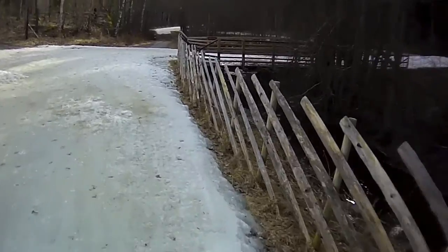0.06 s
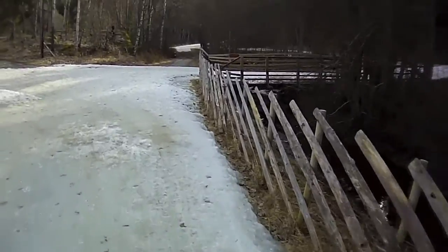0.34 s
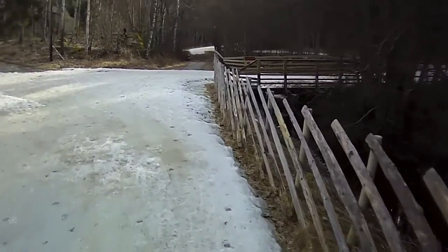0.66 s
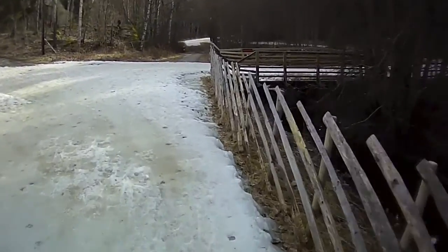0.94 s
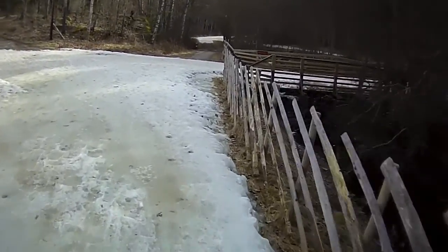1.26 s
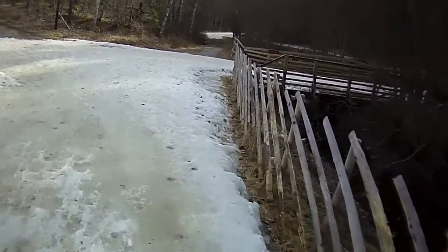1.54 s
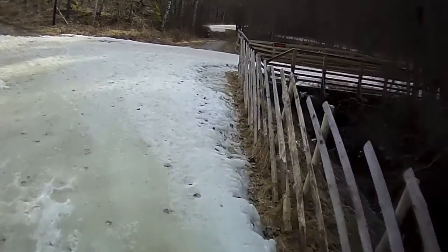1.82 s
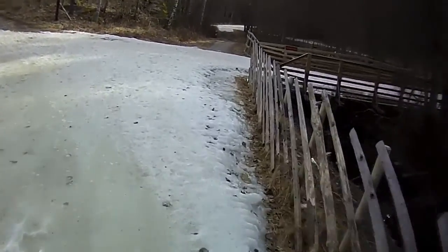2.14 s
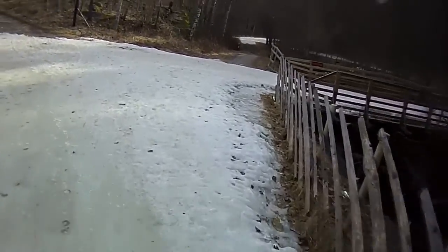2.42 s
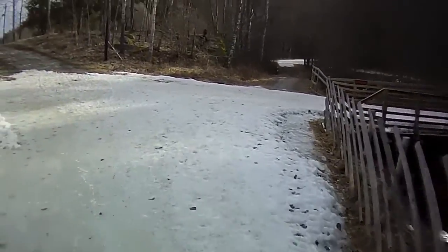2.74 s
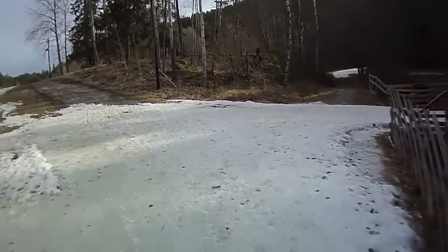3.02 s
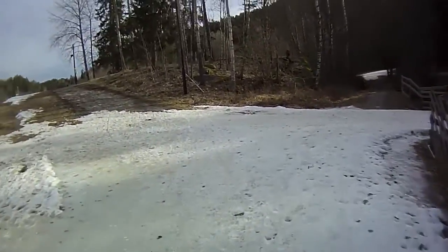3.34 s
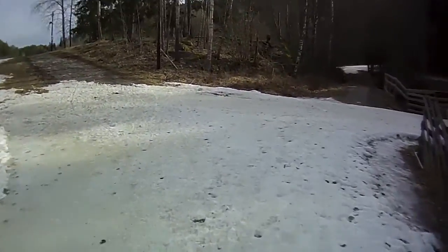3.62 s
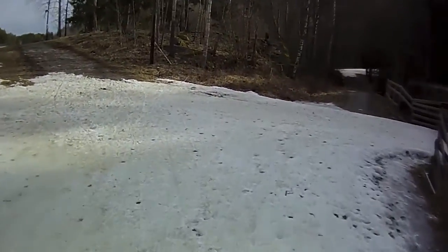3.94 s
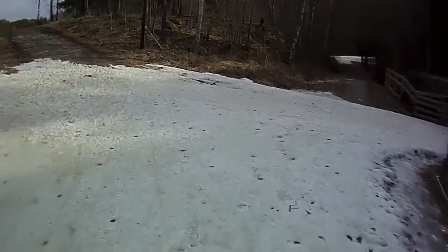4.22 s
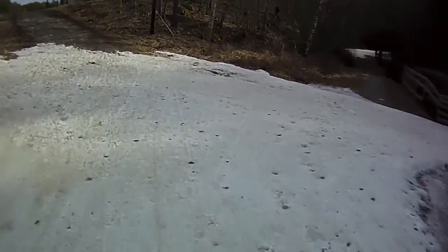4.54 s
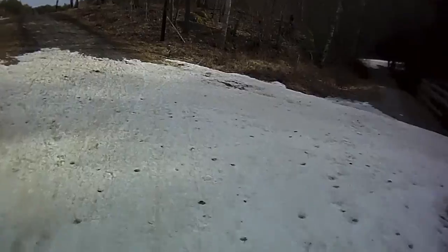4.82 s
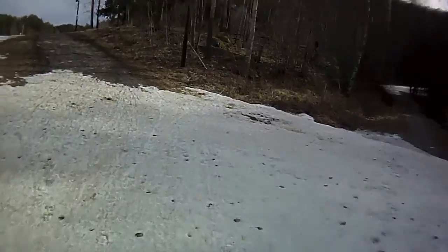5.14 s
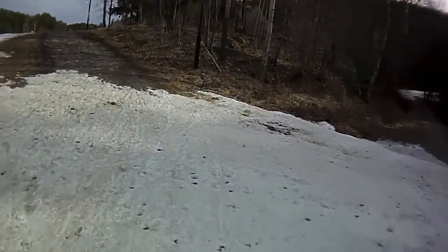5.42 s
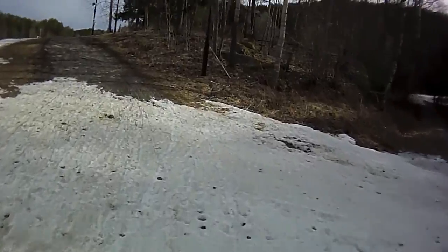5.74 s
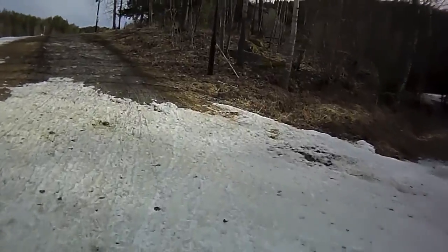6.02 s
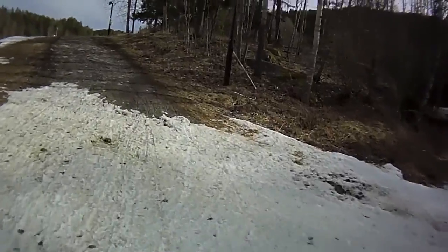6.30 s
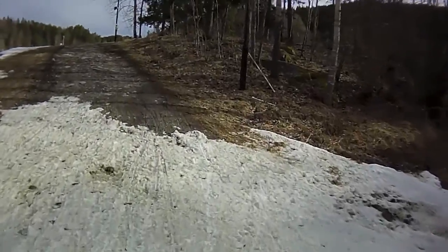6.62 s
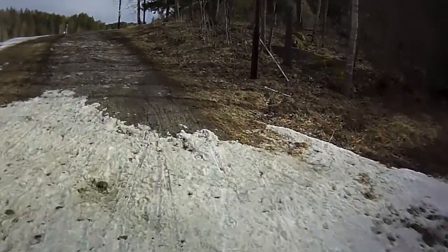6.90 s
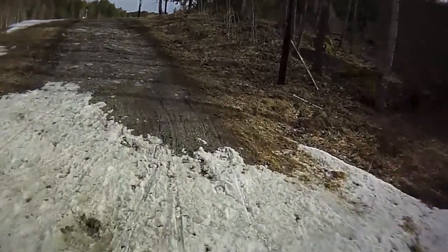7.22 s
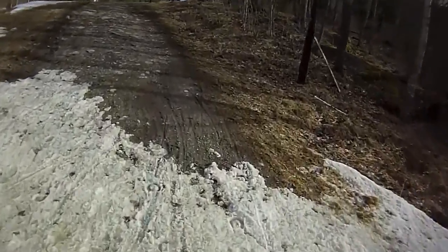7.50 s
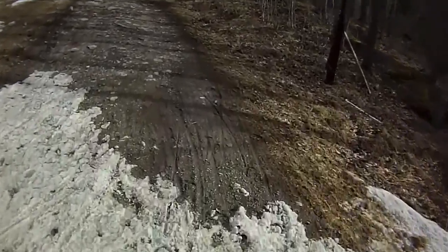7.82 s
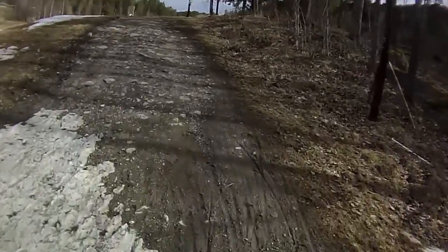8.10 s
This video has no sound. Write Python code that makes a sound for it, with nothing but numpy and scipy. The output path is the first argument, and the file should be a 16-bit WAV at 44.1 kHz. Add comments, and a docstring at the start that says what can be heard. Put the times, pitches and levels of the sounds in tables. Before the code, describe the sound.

Bicycle tyres crunch over gritty ice and crusted snow, with popping stones and knocks, as wind rumble grows into hard buffeting.

```python
"""A bicycle rolls towards a gravel track, heard from a camera on the rider. First gritty ice: grains crack
under the tyres in clusters, stones pop, the tread drums, bumps ring the hollow body. After 2 s smooth
ice quiets the crunch and a far bird whistles four notes. From 3 s the crunch returns, coarser; a low
gust passes at 4.5 s as grit gives way to crusted snow. From 6 s wind buffets the microphone hard."""
import sys
import numpy as np
from scipy import signal
from scipy.fft import rfft, irfft
from scipy.io import wavfile
from scipy.ndimage import uniform_filter1d

SR = 44100
rng = np.random.default_rng(int(sys.argv[2]) if len(sys.argv) > 2 else 0)


def wav_out(sig):
    """Save sig, one row per channel (or a flat mono array), as 16-bit PCM at SR to the path in sys.argv[1]."""
    wavfile.write(sys.argv[1], SR, np.round(np.clip(np.atleast_2d(sig).T, -1, 1) * 32767).astype(np.int16))


N = 368674
T = np.arange(N) / SR

# Far bird's notes. Each row: start in seconds, peak in dB.
BIRD_NOTES = [(2.175, -61), (2.395, -65), (2.61, -65), (2.82, -64)]
# Wind on the microphone. Each row: time in seconds, relative level in dB.
WIND_DB = [(0, -55), (.15, -46.5), (.4, -52.5), (.75, -44), (1.5, -44), (2.5, -46), (3.2, -50.5),
           (3.8, -43.5), (4.35, -43), (4.8, -45.5), (5.0, -41.5), (5.45, -40), (6.0, -31.5), (6.5, -32),
           (7.4, -28.5), (7.85, -32), (8.36, -31)]
# Eddies on top of the wind. Each row: middle in seconds, length in seconds, rise in dB.
EDDIES = [(2.12, 0.063, 2.5), (2.51, 0.079, 3.5), (2.88, .07, 5), (4.01, .06, 5), (4.21, 0.098, 3.5),
          (5.11, .05, 3.5), (6.09, 0.085, 4), (6.4, 0.045, 6.5), (7.02, 0.038, 1), (7.45, 0.051, 0.5),
          (8.0, .12, 2.5)]
# Light wind spectrum. Each row: frequency in Hz, gain in dB.
BREEZE_EQ = [(8, -30.5), (22, 4), (45, 1), (80, -3), (120, -9), (200, -18.5), (400, -21.5), (1500, -75)]
# Strong wind spectrum. Each row: frequency in Hz, gain in dB.
BUFFET_EQ = [(8, -17), (25, -4), (48, -2), (72, 3.5), (105, -4.5), (160, -8.5), (260, -17), (450, -23.5),
             (800, -38.5), (3000, -97)]
# Knocks on the bike. Each row: start in seconds, thud peak in dB.
BUMPS = [(0.195, -32.5), (0.966, -45), (2.201, -36.5), (3.618, -47), (3.974, -31), (4.289, -35),
         (5.022, -41), (5.134, -42), (5.336, -39), (5.807, -34), (6.294, -31), (7.014, -31), (7.102, -28.5),
         (7.135, -34), (8.234, -30.5)]
# Modes of the bike's body. Each row: frequency in Hz, gain in dB, T60 in seconds.
BODY_MODES = [(285.6, 5.5, .11), (299.7, 6.5, 0.21), (430, -18, 0.07), (476, -21, .07), (552, -6.5, 0.065),
              (614.5, -5, 0.23), (748, -5.5, 0.11), (896, -9, 0.11)]
# Tyre drumming spectrum. Each row: frequency in Hz, gain in dB.
TYRE_EQ = [(120, -26), (230, -6.5), (290, 5), (350, 4), (450, 3.5), (600, -2.5), (820, -13), (1200, -4.5),
           (2500, -45.5), (7000, -58)]
# Rolling noise. Each row: time in seconds, relative level in dB.
ROLL_DB = [(0, -59.5), (.25, -54), (1.4, -58), (2.1, -54), (2.65, -61.5), (3.7, -49), (4.4, -52),
           (5.0, -48.5), (5.9, -51.5), (6.2, -47), (6.95, -43), (7.75, -51), (8.3, -42.5)]
# Crunch of grit, smooth ice, then crusted snow. Each row: time in seconds, level in dB.
GROUND_DB = [(0, -46), (1.2, -50), (1.75, -46.5), (2.1, -47.5), (2.3, -58), (2.65, -61.5), (3.0, -53.5),
             (3.2, -47.5), (3.55, -53.5), (3.8, -47), (4.15, -47.5), (4.4, -45.5), (5.3, -46), (6.2, -45.5),
             (6.7, -46), (7.3, -47), (7.85, -48.5), (8.36, -42.5)]
# Crust caving in. Each row: middle in seconds, length in seconds, rise in dB.
CRUSHES = [(.15, .1, 2), (.43, 0.024, 2), (1.097, 0.11, 5), (1.65, 0.09, 0.5), (1.93, .025, 6),
           (2.03, 0.021, 6), (2.093, 0.031, 7), (2.205, 0.018, 5), (2.5, .06, 10.5), (2.9, 0.042, 9.5),
           (3.19, 0.047, 1.5), (3.495, .04, 9), (3.625, .025, 8), (3.89, 0.029, 7), (4.286, 0.079, 4.5),
           (4.758, 0.068, 8), (4.98, 0.048, 7), (5.03, .04, 6.5), (5.26, 0.027, 6.5), (6.04, 0.02, 5.5),
           (6.684, .13, 6), (6.96, 0.027, 10.5), (7.61, 0.092, 6.5)]
# Slick spots. Each row: middle in seconds, length in seconds, drop in dB.
SLICKS = [(0.079, 0.024, 10), (0.317, 0.042, 8.5), (1.185, .03, 5), (1.358, 0.033, 8), (1.758, 0.041, 11),
          (2.83, 0.024, 3), (3.0, .06, 5), (3.386, 0.028, 10), (3.924, 0.047, 8), (4.01, 0.033, 6),
          (4.242, 0.024, 18), (4.648, 0.038, 8), (4.914, 0.041, 12.5), (5.108, .03, 7), (5.315, 0.02, 2),
          (5.55, 0.021, 7.5), (7.2, 0.023, 6), (7.96, 0.017, 15)]
# Share of coarse crust and gravel. Each row: time in seconds, relative weight in dB.
COARSE_DB = [(0, -3.5), (.8, -5), (1.6, -4.5), (2.3, -5), (2.9, -6), (3.25, 0), (3.9, 1.5), (4.4, -3),
             (5.05, 0), (6.3, -0.5), (7.7, -1), (8.3, 3)]
# Larger stones and ice chips. Each row: time in seconds, relative peak in dB, pitch in Hz.
STONES = [(0.1187, -22, 2980), (0.4163, -24, 2950), (0.8829, -27, 2880), (1.0614, -25, 2910),
          (1.2064, -26, 3140), (1.2732, -26, 2160), (1.588, -27, 3040), (1.6235, -22, 2910),
          (1.861, -16, 2320), (1.9231, -17, 3900), (2.0287, -19, 2910), (2.0433, -26, 1860),
          (2.0892, -25, 3080), (2.1469, -27, 3020), (2.439, -35, 3500), (2.7791, -35, 3500),
          (2.883, -28, 3130), (2.905, -26, 3170), (3.1105, -26, 2210), (3.1395, -27, 2390),
          (3.1713, -26, 2270), (3.186, -20, 2090), (3.2365, -20, 2390), (3.274, -22, 1860),
          (3.3114, -21, 2230), (3.5343, -26, 2150), (3.6667, -25, 2420), (3.7995, -23, 2720),
          (3.8858, -23, 2830), (3.9779, -26, 1880), (4.2881, -22, 3020), (4.5183, -23, 2800),
          (4.9657, -27, 3410), (5.0318, -19, 2050), (5.3387, -24, 3250), (5.3831, -22, 2870),
          (5.5661, -28, 2240), (5.8106, -24, 1980), (5.8595, -26, 3260), (6.4668, -24, 2850),
          (6.9598, -24, 2770), (7.0351, -25, 2360), (7.3253, -23, 2400), (7.8402, -22, 2580),
          (8.0025, -24, 1400), (8.1749, -20.5, 2840), (8.218, -25, 1300), (8.2699, -22, 2920)]
# Response of the camera's case. Each row: frequency in Hz, gain in dB.
CASE_EQ = [(300, -10.5), (850, -9), (1150, -3.5), (2000, 3), (2700, 3.5), (3350, 7), (3650, -0.5),
           (4050, 0.5), (4700, -4.5), (5650, -16), (6300, -15), (7200, -21.5), (8000, -25), (15000, -50)]
# Camera hiss spectrum. Each row: frequency in Hz, gain in dB.
HISS_EQ = [(100, 6.5), (7500, -2.5), (8350, -4.5), (8600, 3.5), (8850, -2.5), (15000, -4)]


def undb(db):
    """Decibels to gain."""
    return 10 ** (np.asarray(db) / 20)


def unit(x):
    """Scale to rms 1."""
    return x / np.sqrt(np.mean(x ** 2))


def curve(table):
    """Rows of time and value, joined linearly."""
    return np.interp(T, *np.transpose(table))


def hump(middle_s, length_s):
    """Bell curve; length_s is the width at half height."""
    return np.exp2(-(2 * (T - middle_s) / length_s) ** 2)


def swells(table):
    """Sum of humps in dB."""
    return sum(db * hump(middle_s, length_s) for middle_s, length_s, db in table)


def walk(knots_per_s):
    """Random wander, rms 1."""
    knots = rng.standard_normal(6000)
    return unit(np.interp(T * knots_per_s, np.arange(len(knots)), knots))


def colour(x, eq, size=4096):
    """Minimum-phase filter with response eq."""
    hz, db = np.transpose(eq)
    bins_hz = np.maximum(np.arange(size // 2 + 1) * SR / size, 1)
    gain = undb(np.interp(np.log(bins_hz), np.log(hz), db))
    cepstrum = irfft(np.log(gain))
    cepstrum[1:size // 2] *= 2
    cepstrum[size // 2 + 1:] = 0
    return signal.fftconvolve(x, irfft(np.exp(rfft(cepstrum))))[:len(x)]


def ring(x, hz, t60_s):
    """One damped mode; a unit click rings with amplitude 1."""
    r, w = np.exp(-np.log(1000) / (t60_s * SR)), 2 * np.pi * hz / SR
    return signal.lfilter([0, r * np.sin(w)], [1, -2 * r * np.cos(w), r * r], x + 1e-18)


def add(out, start_s, x):
    """Mix x into out."""
    i = max(int(start_s * SR), 0)
    out[i:i + len(x)] += x[:len(out) - i]


def clicks(per_s, spread_db, limit):
    """Random clicks of either sign; level is spread_db times an exponential draw capped at limit."""
    chance = rng.random(N) * SR / per_s
    at = np.flatnonzero(chance < 1)
    out = np.zeros(N)
    out[at] = undb(spread_db * np.minimum(-np.log(chance[at]), limit)) * (-1.) ** at
    return out


def bird(size=3000):
    """Short whistles slide down and level off; pitch jitter stands for blurring by trees."""
    out, progress = np.zeros(N), np.arange(size) / size
    for start_s, db in BIRD_NOTES:
        hz = 4500 + 650 * np.exp(-progress / .33) + 120 * walk(600)[:size]
        whistle = np.sin(2 * np.pi * np.cumsum(hz) / SR)
        add(out, start_s, undb(db) * np.sin(np.pi * progress) * whistle)
    return out


def gust():
    """One slow, low eddy flaps past the microphone."""
    flap = unit(ring(rng.standard_normal(N), hz=39.3, t60_s=0.14))
    return flap * undb(-36) * hump(middle_s=4.54, length_s=0.19)


def wind():
    """Soft rumble turns to brighter, choppy buffeting as the air speeds up."""
    db = curve(WIND_DB) + swells(EDDIES)
    rough = np.clip((db + 45) / 9, .02, 1)
    breeze = unit(colour(rng.standard_normal(N), BREEZE_EQ))
    buffet = unit(colour(rng.standard_normal(N) * undb(1.46 * walk(28)), BUFFET_EQ))
    return undb(db - 2) * (np.sqrt(1 - rough) * breeze + np.sqrt(rough) * buffet)


def body(force):
    """The bike's hollow ring."""
    return sum(undb(db) * ring(force, hz, t60_s) for hz, db, t60_s in BODY_MODES)


def bumps(size=12000, decay_s=0.0079):
    """Short rattling blows thud and ring the body."""
    out, t = np.zeros(N), np.arange(size) / SR
    for start_s, db in BUMPS:
        force = 0.68 * rng.standard_normal(size) * np.exp(-t / decay_s)
        force[0] = 1
        thud, tone = colour(force, TYRE_EQ), body(force)
        knock = thud / np.abs(thud).max() + 0.53 * tone / np.abs(tone).max()
        add(out, start_s + 0.001915, undb(db) * knock)
    return out


def tread_load_db():
    """Crunch level: uneven ground sets it, caving crust lifts it, slick spots drop it."""
    return curve(GROUND_DB) + swells(CRUSHES) - swells(SLICKS) + 1.72 * walk(45)


def rolling(load_db):
    """The tread drums on rough crust and rings the body, harder where the crust gives way."""
    jolt_db = 0.51 * (load_db - uniform_filter1d(load_db, size=16000))
    road = clicks(per_s=1800, spread_db=5.5, limit=4.37) * undb(2.04 * walk(22) + jolt_db)
    drum = unit(colour(road, TYRE_EQ)) + undb(-0.5) * unit(body(road))
    return drum * undb(curve(ROLL_DB) - 2)


def swish(load_db, usual_db=-47.5):
    """Wet crystals fizz under the tread, steadier than the crunch."""
    fizz = colour(rng.standard_normal(N), [(800, 6), (2500, -3), (4400, 1.5), (7000, -4), (15000, -5)])
    return unit(colour(fizz, CASE_EQ)) * undb(.5 * (load_db - usual_db) - 58)


def chip(force, hz, cycles, crack):
    """A chip of ice or grit swells within a cycle and fades; its broad crack rides on top."""
    tone = ring(force, hz, cycles / hz)
    return ring(tone, hz, cycles / hz) * hz / SR + crack * tone


def stray_stones(load_db, count=28, centre_hz=2760, spread_octaves=0.2):
    """Small stones at random times, louder under more load; rows as in STONES."""
    at, scatter = rng.integers(N, size=count), rng.standard_normal((count, 2))
    db = load_db[at] + 21.5 + 0.4 * scatter[:, 0]
    hz = centre_hz * 2 ** (spread_octaves * scatter[:, 1])
    return list(zip(T[at], db, hz))


def stone_pops(load_db, size=2048, crumb_decay_s=0.0042):
    """Each stone snaps out from under the tread, rings briefly and scatters crumbs."""
    out, t = np.zeros(N), np.arange(size) / SR
    blow = signal.unit_impulse(size)
    for time_s, db, hz in STONES + stray_stones(load_db):
        noise, chance = rng.standard_normal((2, size)), rng.random((2, size))
        crumbs = 0.29 * np.tanh(noise) * (chance < .028) * np.exp(-t / crumb_decay_s)
        stone = chip(blow + crumbs[0], hz, cycles=2.94, crack=0.0037)
        low_mode = 0.064 * chip(blow, 0.54 * hz, cycles=2.16, crack=0.015)
        debris = chip(crumbs[1], 1.06 * hz, cycles=3.26, crack=0.013)
        snap = colour(stone + low_mode + debris, CASE_EQ)
        add(out, time_s - .0002, snap / np.abs(snap).max() * undb(db - 0.5))
    return out


def crunch(load_db, usual_db=-47.5, slab_decay_s=0.0048):
    """Grains crack in clusters; coarse ones ring low, fine ones high."""
    coarse_db, grains = curve(COARSE_DB) + 0.5, 0
    density = undb(.6 * (load_db - usual_db))  # a harder crush breaks more grains
    for hz in np.geomspace(1000, 7000, num=22):
        breaks = clicks(per_s=190 * density, spread_db=2.5, limit=3.58)
        band = unit(chip(breaks, hz, cycles=6.9, crack=0.018))
        coarseness = np.clip(np.log2(2800 / hz), -.2, 1)
        patch_db = 2.6 * walk(32)
        grains = grains + band * undb(coarseness * coarse_db + patch_db)
    # Crust fails in small slabs, each a decaying burst of grains.
    collapses = np.abs(clicks(per_s=120, spread_db=-1.5, limit=3.4))
    slabs = signal.lfilter([1], [1, -np.exp(-1 / (slab_decay_s * SR))], collapses)
    grittiness = np.interp(T, [4.0, 6.0], [1, .8])  # snow crushes more evenly than grit
    clusters = grains * (0.59 + unit(slabs)) ** grittiness / np.sqrt(density)
    return unit(colour(clusters, CASE_EQ)) * undb(load_db)


def scene():
    """Tyres, bike, wind and bird at one microphone."""
    load_db = tread_load_db()
    tyres = crunch(load_db) + swish(load_db) + stone_pops(load_db) + rolling(load_db)
    return (tyres + bumps() + wind() + gust() + bird())[None]


def record(dry):
    """The camera adds faint hiss, cuts the top and rests slightly off zero."""
    cutoff_hz, dc_offset = 15350, -.0039
    hiss = undb(-72.5) * unit(colour(rng.standard_normal(N), HISS_EQ))
    lowpass = signal.ellip(10, .2, 70, cutoff_hz, fs=SR, output="sos")
    return dc_offset + signal.sosfilt(lowpass, dry + hiss)


dry = scene()
out = record(dry)
wav_out(out)
```